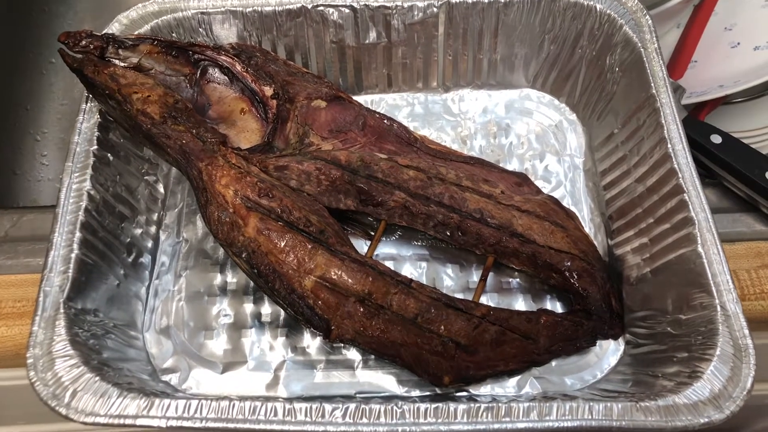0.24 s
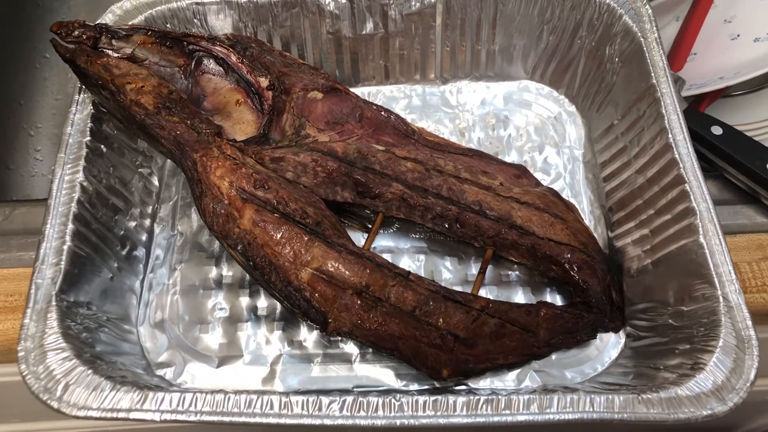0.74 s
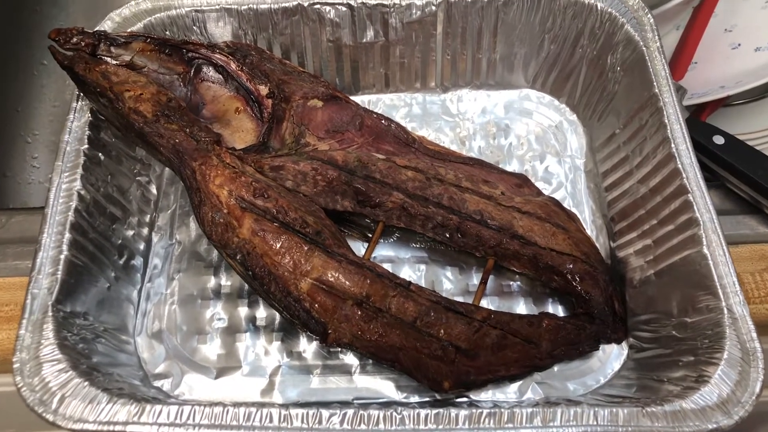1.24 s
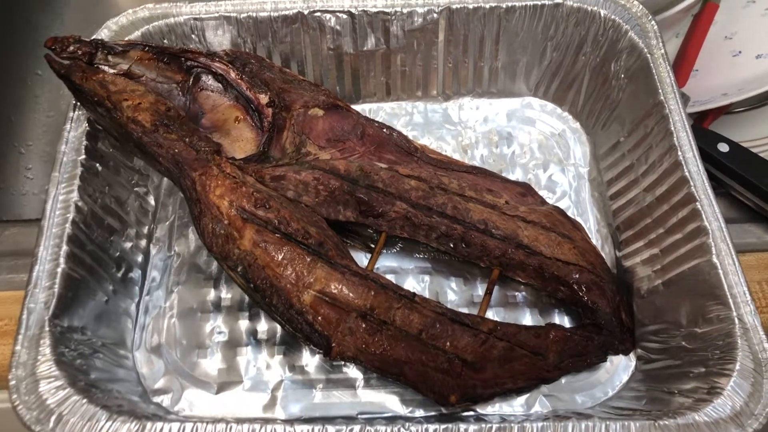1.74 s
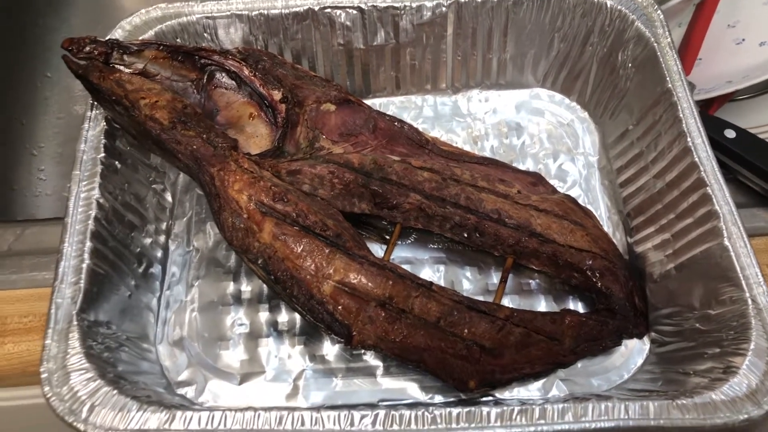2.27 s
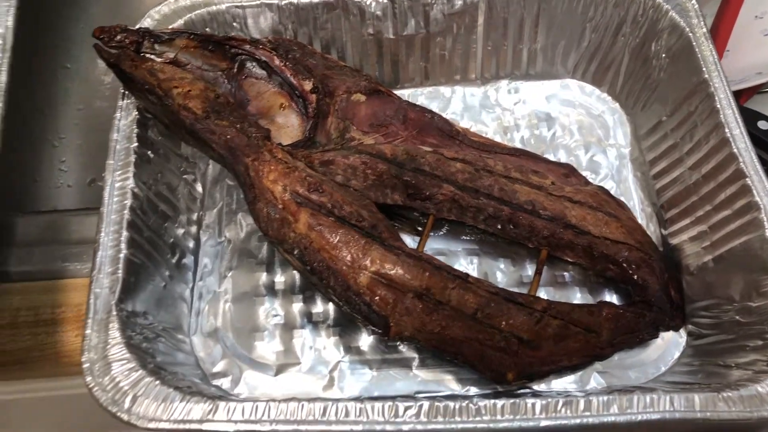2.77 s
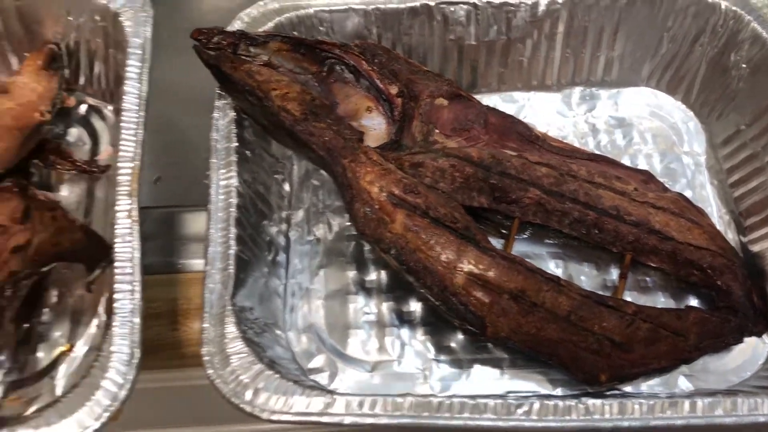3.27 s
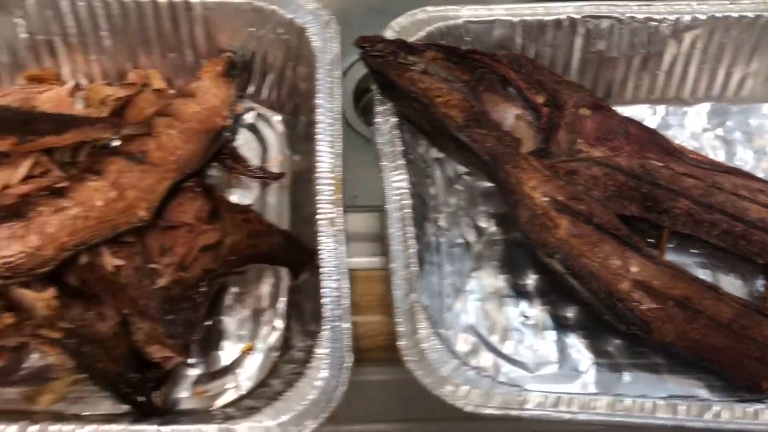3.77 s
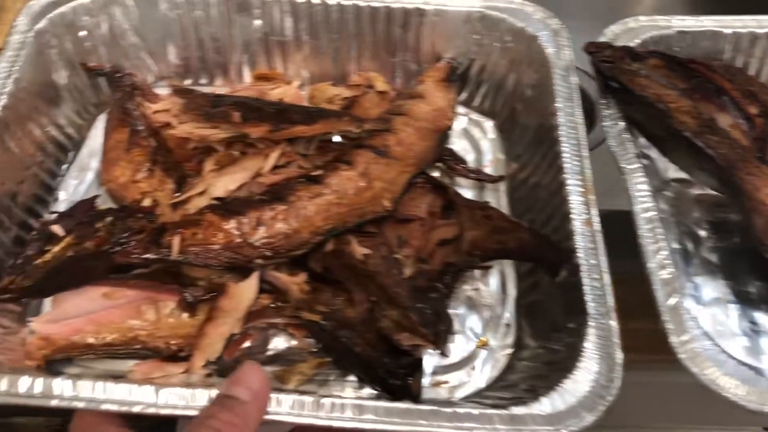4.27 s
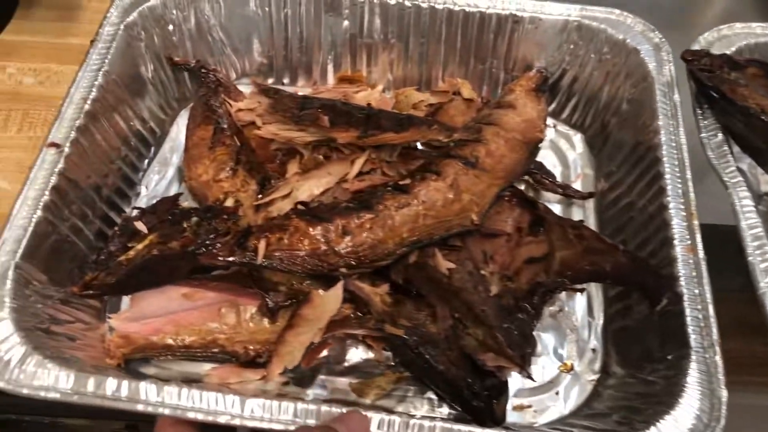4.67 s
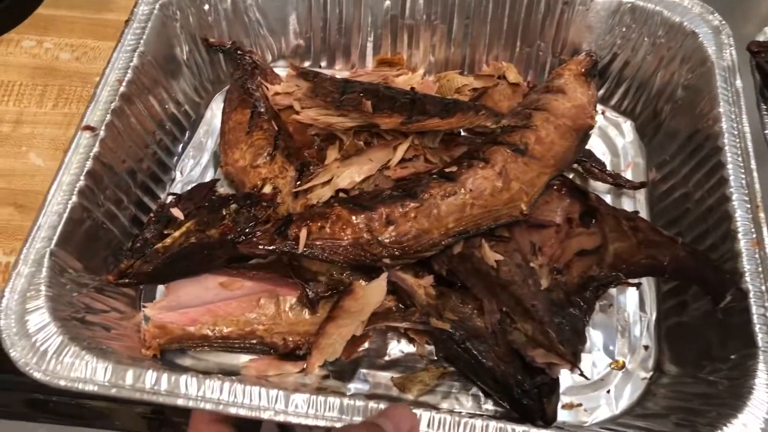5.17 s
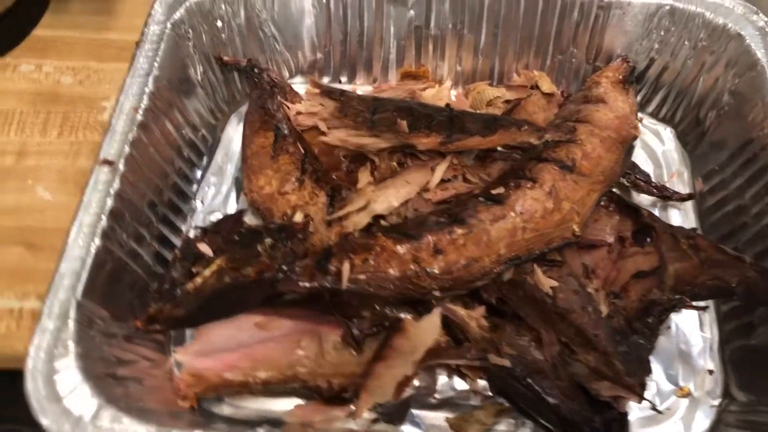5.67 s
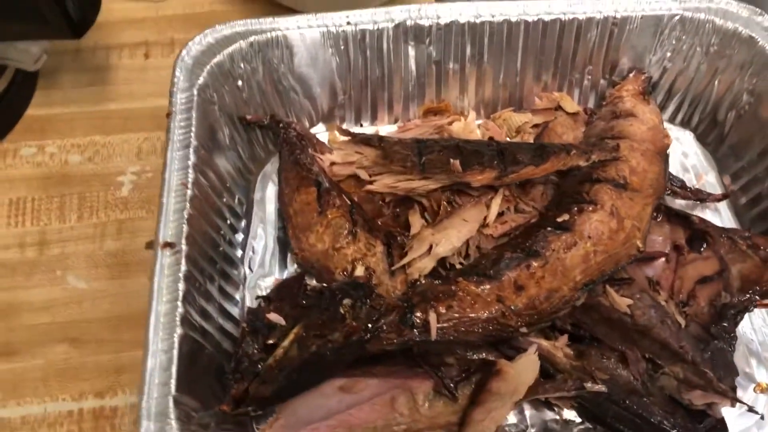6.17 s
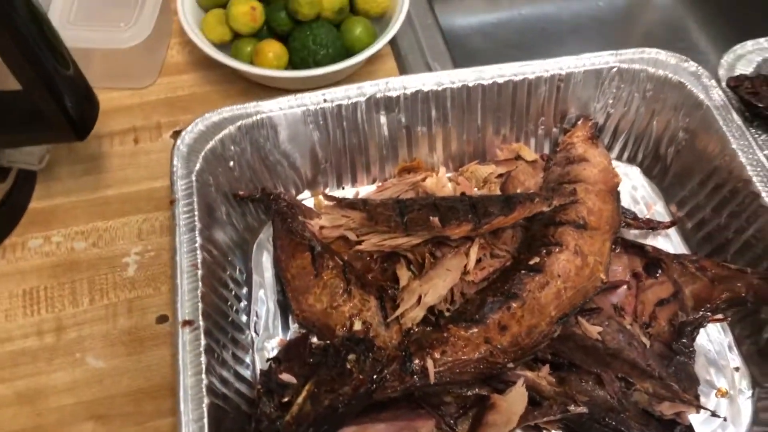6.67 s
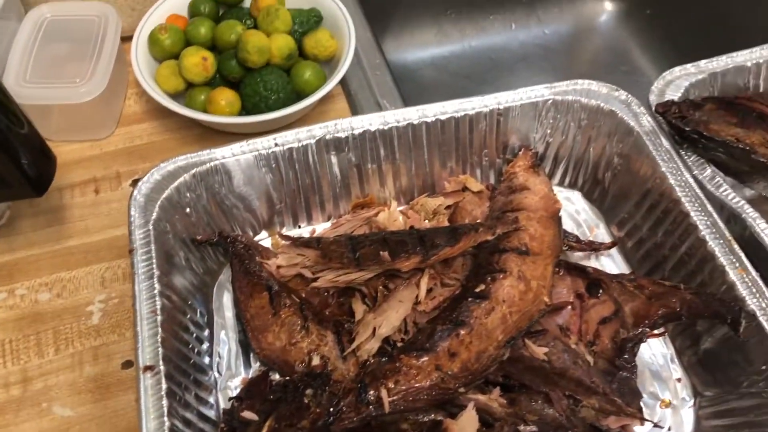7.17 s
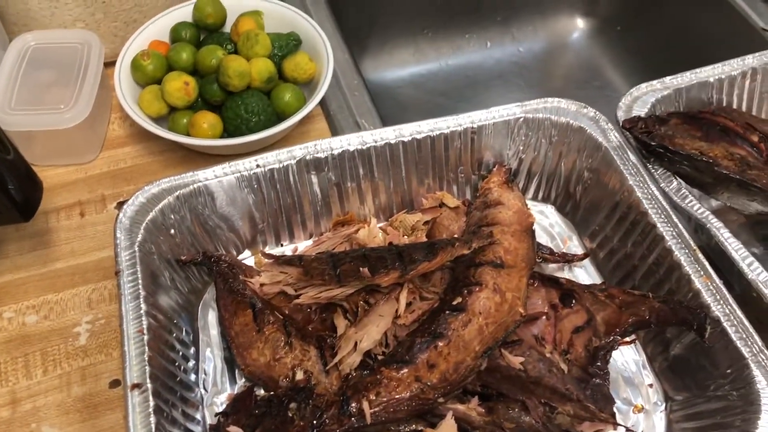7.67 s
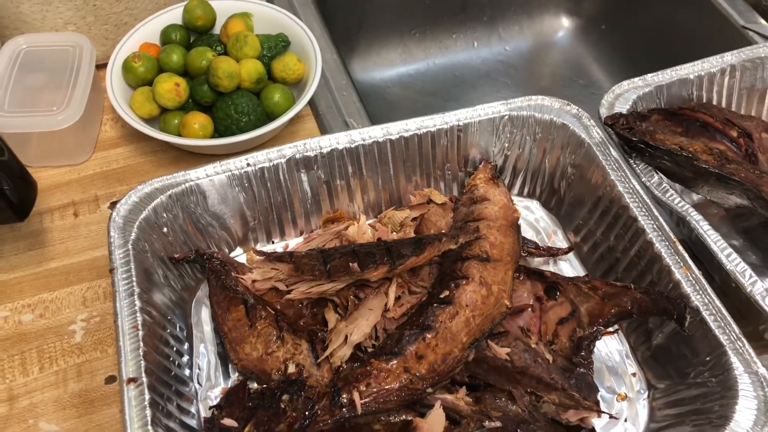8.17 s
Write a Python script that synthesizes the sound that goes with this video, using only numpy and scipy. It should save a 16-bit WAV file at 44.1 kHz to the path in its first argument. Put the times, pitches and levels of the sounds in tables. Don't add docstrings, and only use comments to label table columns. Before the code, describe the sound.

A thin foil pan holding cooked meat gets a sharp buckling blow, then rustles, slides and pops on a counter while a clock ticks.

```python
import sys
import numpy as np
from scipy import signal
from scipy.fft import rfft, irfft, next_fast_len
from scipy.io import wavfile
from scipy.ndimage import uniform_filter1d, map_coordinates

SR = 44100
rng = np.random.default_rng(int(sys.argv[2]) if len(sys.argv) > 2 else 0)


def undo_db(level):
    steps = np.asarray(level, float) / 20
    return 10 ** steps


def wrap_up_sound(samples):
    columns = np.atleast_2d(samples).T
    tamed = np.clip(columns, -1, 1)
    steps = np.round(tamed * 32767).astype(np.int16)
    wavfile.write(sys.argv[1], SR, steps)


N = 371763


def unit(x):
    return x / np.sqrt(np.mean(x ** 2) + 1e-20)


def along(points, hz):
    f, v = np.transpose(points)
    return np.interp(np.log(hz + 1), np.log(f + 1), v)


def wobble(rate_hz):
    knots = rng.standard_normal(int(N * rate_hz / SR) + 4)
    return map_coordinates(knots, [np.arange(N) * rate_hz / SR])


def filtered(x, response):
    m = next_fast_len(N + 8192)
    return irfft(rfft(x, m) * response(np.fft.rfftfreq(m, 1 / SR)), m)[:N]


def above(x, edge_hz):
    return filtered(x, lambda f: -f * f / (edge_hz ** 2 - f * f + 1j * np.sqrt(2) * f * edge_hz))


def resonant(x, peaks):
    def response(f):
        total = 0
        for k, (centre, width, db) in enumerate(peaks):
            damping = 1j * f * width
            total = total + (-1) ** k * undo_db(db) * damping / (centre * centre - f * f + damping)
        return total
    return unit(filtered(x, response))


def crackle(per_s, spread_db, smooth):
    hits = rng.random(N) < per_s / SR
    clicks = hits * undo_db(spread_db * rng.standard_normal(N)) * rng.choice([-1, 1], N)
    return unit(unit(clicks) + smooth * rng.standard_normal(N))


def patchy(x, depth_db, size=(5, 10)):
    z = signal.stft(x, nperseg=512)[2]
    field = uniform_filter1d(rng.standard_normal(z.shape), size=size[0], axis=0)
    field = uniform_filter1d(field, size=size[1], axis=1)
    return signal.istft(z * undo_db(depth_db * unit(field)), nperseg=512)[1][:N]


def add(track, s, sound):
    part = track[round(s * SR):][:len(sound)]
    part += sound[:len(part)]


# f/Hz, t60/s
KITCHEN = [(200, 0.15), (1000, 0.25), (4000, 0.16), (12000, 0.25)]


def echo(sound, wet_db, feed=None):
    hz, t, z = signal.stft(rng.standard_normal(SR // 3), SR, nperseg=256)
    decay = undo_db(-60 * t / along(KITCHEN, hz)[:, None])
    tail = signal.istft(z * decay, SR, nperseg=256)[1]
    tail *= 1 - np.exp(-np.arange(len(tail)) / (0.003 * SR))
    tail *= undo_db(wet_db) / np.linalg.norm(tail)
    wet = signal.fftconvolve(sound if feed is None else feed, tail)
    add(wet, 0, sound)
    return wet


def ring(hz, db, t60, phase, rise):
    t = np.arange(SR // 8)[:, None] / SR
    envelope = undo_db(db - 60 * t / t60) * (1 - np.exp(-t / rise))
    return (envelope * np.sin(2 * np.pi * hz * t + phase)).sum(axis=1)


# f/Hz, level/dB per Hz
AIR = [(24, -34), (40, -7), (101, -3), (140, -6), (204, -1), (382, -12), (444, -15), (630, -18),
       (715, -19.5), (1020, -17), (1520, -27), (1900, -27.5), (2210, -30.5), (9220, -39.5), (16000, -46)]
# f/Hz, level/dB
HUM = [(59.2, -90), (118.4, -65), (199.2, -67)]
# t/s, nearness to fan/dB
NEAR_FAN = [
    (0, 1.5),
    (2.5, -3.5),
    (3.75, 8),
    (4.2, -8),
    (7.3, -15),
    (8.43, -7),
]
FAN_DB, HUM_DB, HUM_YIELDS = -77, -4.2, .4


def kitchen():
    t = np.arange(N) / SR
    near_db = np.interp(t, *np.transpose(NEAR_FAN))
    noise = patchy(rng.standard_normal(N), depth_db=1.4)
    air = undo_db(-58.5) * unit(filtered(noise, lambda hz: undo_db(along(AIR, hz))))
    hum = np.zeros(N)
    for hz, db in HUM:
        hum += undo_db(db + 4 * wobble(10)) * np.sin(2 * np.pi * hz * t + 1.5 * wobble(9))
    fan = resonant(rng.standard_normal(N), [(1100, 110, 0)])
    return air + undo_db(HUM_DB - HUM_YIELDS * near_db) * hum + undo_db(FAN_DB + near_db) * fan


CLOCK_START_S, CLOCK_PERIOD_S = .497, .9963
# f/Hz, width/Hz, level/dB
CLOCK = [(1236, 310, 6), (2490, 530, -3), (3620, 390, -3), (5540, 570, -8.5), (7000, 1200, -16),
         (10540, 580, -14), (13100, 4400, -26.5)]


def clock():
    since = (np.arange(N) / SR - CLOCK_START_S + .5) % CLOCK_PERIOD_S - .5
    slack = undo_db(540 * (since - .004))
    rest = undo_db(-60 * np.maximum(since - .022, 0) / .21)
    rattle = crackle(per_s=1200, spread_db=4, smooth=1.1)
    return undo_db(-55.5) * np.where(since < .004, slack, rest) * resonant(rattle, CLOCK)


# t/s, length/s, level/dB
SCUFFS = [
    (4.595, 0.053, -61),
    (5.584, 0.055, -69.5),
    (6.53, 0.13, -60.5),
    (6.814, 0.09, -71),
    (7.082, 0.068, -64.5),
    (7.303, 0.11, -71.5),
    (7.531, 0.082, -63),
]
# f/Hz, width/Hz, level/dB
SOLE = [(2530, 410, 4), (4240, 320, -1.5), (5370, 840, -7), (9000, 1180, -24)]


def slippers():
    t = np.arange(N) / SR
    shape = sum(undo_db(db) * np.exp(-np.abs((t - s) / (length / 2)) ** 2.4) for s, length, db in SCUFFS)
    return shape * resonant(crackle(per_s=2600, spread_db=2.5, smooth=1.0), SOLE)


# t/s, peak/dB, f/Hz, t60/s
TINKS = [
    (0.9981, -48.5, 3360, 0.015),
    (3.1537, -53.5, 3320, 0.021),
]


def drops():
    out = np.zeros(N)
    for s, db, hz, t60 in TINKS:
        tink = ring(hz * np.array([1, 1.12]), db - np.array([2, 6]), t60, 0, rise=0.00074)
        add(out, s, echo(tink, wet_db=-8))
    return out


# from/s, to/s, f/Hz, width/Hz, level/dB
SQUEAK = (5.79, 5.98, 4180, 110, -74.5)


def squeak():
    start, end, hz, width, db = SQUEAK
    shape = np.interp(np.arange(N) / SR, [start, start + 0.036, end - .03, end], [0, 1, 1, 0])
    return undo_db(db) * shape * resonant(rng.standard_normal(N), [(hz, width, 0)])


# t/s, peak/dB, f/Hz, t60/s
KNOCKS = [(1.49, -42, 143, 0.041), (1.537, -38, 250, 0.02), (2.422, -33.5, 337, 0.077),
          (2.484, -35, 222, 0.064), (2.504, -26, 212, 0.094), (2.774, -34, 200, 0.059),
          (2.842, -23.5, 470, 0.018), (2.987, -31, 314, 0.035), (3.793, -38, 440, 0.031),
          (3.878, -29, 173, 0.047), (3.912, -27, 483, 0.038), (3.987, -42, 160, 0.085),
          (4.128, -40, 164, 0.05), (6.205, -49, 220, 0.085)]


def base_knocks():
    out = np.zeros(N)
    for s, db, hz, t60 in KNOCKS:
        bump = ring(hz * np.array([1, 1.45]), db - np.array([-1.5, 5]), t60, 0, rise=0.0012)
        add(out, s - .002, echo(bump, wet_db=-0.5))
    return out


# t/s, peak/dB, f/Hz, t60/s
TOCKS = [(0.853, -34, 820, 0.014), (1.486, -44, 560, 0.025), (1.535, -42, 480, 0.022),
         (2.419, -22, 950, 0.032), (2.503, -21.5, 1235, 0.059), (2.739, -20.5, 1400, 0.03),
         (2.841, -32.5, 980, 0.05), (2.986, -22.5, 1087, 0.036), (3.911, -22, 1040, 0.016),
         (5.058, -37.5, 796, 0.025), (5.561, -46, 1450, 0.042), (7.584, -50.5, 657, 0.035)]


def panel_tocks():
    out = np.zeros(N)
    for s, db, hz, t60 in TOCKS:
        note = ring(hz * np.array([1, 1.13]), db - np.array([3, 8]), t60, 0, rise=0.00019)
        add(out, s, echo(note, wet_db=-9.0))
    return out


BLOW_S = 2.175
STRAIN_S, STRAIN_DB, STRAIN_FIZZ_DB, STRAIN_SWELL_DB = .03, -55, -10, 11
# t/s, pressure/dB
SLIDE = [
    (2.175, -72),
    (2.22, -58.5),
    (2.333, -48),
    (2.41, -44),
    (2.6, -48),
    (2.81, -56),
    (3.06, -56.5),
    (3.105, -72),
    (3.3, -80),
]
SLIDE_FIZZ_DB, FIZZ_GROWS, FIRM_DB = -8, 1.3, -50.5
# peak t/s, rise/s, fall/s, body/dB, fizz/dB re body
RUBS = [
    (1.46, .05, 0.036, -82, 2.5),
    (3.49, .15, .35, -63.5, -6.5),
    (3.68, 0.063, 0.28, -59.5, -10),
    (4.32, 0.24, 0.16, -56.5, -7.5),
    (4.465, .03, 0.094, -61.5, -19.5),
    (4.67, .2, 0.33, -70, -9),
    (5.17, 0.33, 0.38, -67, -6),
    (5.47, .04, 0.45, -71.5, -10),
    (6.04, 0.25, 0.2, -67, -4),
]
RUB_FADE_DB = 20


def strokes():
    t = np.arange(N) / SR
    before = (BLOW_S - t) / STRAIN_S
    swell_db = STRAIN_SWELL_DB * (1 - np.clip(before, 0, 1))
    strain = (before > 0) * (before < 1) * undo_db(STRAIN_DB + swell_db)
    press_db = np.interp(t, *np.transpose(SLIDE), left=-140, right=-140)
    body = strain + undo_db(press_db)
    fizz = undo_db(STRAIN_FIZZ_DB) * strain + undo_db(FIRM_DB + SLIDE_FIZZ_DB + FIZZ_GROWS * (press_db - FIRM_DB))
    for s, rise, fall, db, fizz_db in RUBS:
        rub = undo_db(db - RUB_FADE_DB * ((t - s) / np.where(t < s, rise, fall)) ** 2)
        body = body + rub
        fizz = fizz + undo_db(fizz_db) * rub
    return body, fizz


# f/Hz, level/dB per Hz
BODY = [(180, -33.5), (300, -4.5), (396, -13), (495, 1.5), (611, -18), (679, -14.5), (1480, -7),
        (7000, -16.5), (9100, -42), (15400, -120)]
FIZZ = [(2650, -29), (4500, -2), (6320, -9), (7370, -8.5), (8830, -3.5), (15200, -11.5), (16000, -13.5)]
# f/Hz, width/Hz, level/dB
CREASES = [(2686, 500, 1.5), (5200, 1500, -2), (7800, 400, -3.5), (8100, 500, 4.5), (11700, 400, 2.5)]


def rustle():
    clumps = undo_db(1.1 * wobble(40) + .9 * wobble(13))
    grains = patchy(crackle(per_s=3000, spread_db=4.5, smooth=1.3) * clumps, depth_db=1.1)
    grains = patchy(grains, depth_db=1.8, size=(2, 24))

    def through(spectrum):
        def response(hz):
            ribs_db = sum(db / (1 + ((hz - c) / w) ** 2) for c, w, db in CREASES)
            return undo_db(along(spectrum, hz) + ribs_db)
        return unit(filtered(grains, response))

    body, fizz = strokes()
    return body * through(BODY) + fizz * through(FIZZ)


# f/Hz, level/dB, t60/s
RIM = [(522, -5, 0.11), (1459, -6, 0.11), (2482, -12, 0.15), (2729, -27, 5.0), (3289, -14, 0.17),
       (3408, 0, 0.069), (3914, -15.5, 0.14), (4387, -33, 2.2), (4861, -22, 0.13), (5464, -20, 0.19),
       (5905, -29, 0.36), (6363, -18, 0.13), (6492, -24, 0.21), (6621, -27, 0.14)]
# f/Hz, level/dB per Hz
SHUDDER = [(180, -40), (300, -10), (565, -0.5), (1510, -3.5), (3080, -7.5), (3400, -2), (4520, -14.5),
           (6410, -18.5), (16000, -34)]


def blow_aftermath():
    out = np.zeros(N)
    hz, db, t60 = np.transpose(RIM)
    phase = 2 * np.pi * rng.random(len(hz))
    rim = ring(hz, db - 17, .8 * np.minimum(t60, .12), phase, rise=3 / hz)
    add(out, BLOW_S, echo(rim, wet_db=-5))
    t = np.arange(8192) / SR
    shake = undo_db(-16.0 - 60 * t / 0.066) * rng.standard_normal(len(t))
    colour = undo_db(along(SHUDDER, np.fft.rfftfreq(len(t), 1 / SR)))
    add(out, BLOW_S, echo(irfft(rfft(shake) * colour), wet_db=-4.5))
    return out


def averaged(x):
    power = np.abs(uniform_filter1d(np.abs(rfft(x)) ** 2, size=120))
    return np.roll(irfft(np.sqrt(power)), 150)[:600]


# f/Hz, level/dB
FOIL = [(150, -25.5), (330, -15), (15500, 8.5), (16500, -32)]
# f/Hz, t60/s
SHEET = [(700, 0.11), (1900, 0.026), (4000, 0.056), (7000, 0.059), (12500, 0.021)]
# t/s, crease peak/dB, wall/dB re crease, sharpness/dB per oct, droop/dB per oct^2, spark/dB
BLOW = (2.1744, -6.3, -5, 3.5, 4.8, 12)
# t/s, crease peak/dB, wall/dB re crease, sharpness/dB per oct above the crease
BUCKLES = [(0.8535, -51, -9, -20), (1.4719, -60, -3, 6), (1.5322, -55, 4, 3), (2.4164, -23, -1, 4.5),
           (2.4304, -29.5, -8, 5.5), (2.5046, -26.5, 6, -2), (2.5136, -39, 0, 3.5),
           (2.7365, -17.5, -13, 0.5), (2.8418, -28.5, 0, 1.5), (2.9855, -29.5, 1, -20),
           (3.672, -51, -2, 16), (3.7507, -49, 2, 9.5), (3.7941, -39, -7, 5), (3.8736, -42, 5, 11),
           (3.91, -14.5, -8, 4.5), (4.132, -57, 12.5, 6), (5.0581, -40, -0.5, 4.5),
           (5.2002, -48, 5.5, 11.5), (5.563, -46.5, -17, -6), (5.9852, -49, -9.5, 12),
           (7.3664, -54.5, 1, 6)]
# t/s, crease peak/dB, sharpness/dB per oct
TICKS = [(1.453, -72, 4), (2.9494, -51, 1), (3.6336, -56, 6.5), (3.7342, -54, 9), (3.7864, -51, 6),
         (3.805, -58, -3), (3.8397, -60, 4), (3.9854, -55, -4), (4.1889, -51, -5), (4.6915, -58, 2.5),
         (4.7194, -67, -2), (4.783, -62.5, 10), (4.874, -62, 6), (5.177, -54, 2), (5.2827, -55, 1),
         (5.3277, -57.5, 5)]
BUCKLE_DROOP, TICK_DROOP = 5.1, 2.5
TICK_WALL_DB, BUCKLE_SPARK_DB = -5, 2.5


def pops():
    out, t = np.zeros(N), np.arange(8192) / SR
    hz = np.fft.rfftfreq(len(t), 1 / SR)
    centre, t60 = np.transpose(SHEET)
    share = np.array([along(list(zip(centre, one)), hz) for one in np.eye(len(SHEET))])
    share = np.sin(np.pi / 2 * share) ** 2
    rise = 1 - np.exp(-t * centre[:, None] ** .5 / .025)
    fall = undo_db(-60 * t / .009) + undo_db(-7 - 60 * t / t60[:, None])
    octaves = np.log2(centre[1:] / centre[1])
    top = octaves == octaves[-1]
    rows = [BLOW]
    rows += [(*row, BUCKLE_DROOP, BUCKLE_SPARK_DB) for row in BUCKLES]
    rows += [(s, db, TICK_WALL_DB, sharp, TICK_DROOP, 0) for s, db, sharp in TICKS]
    for s, db, wall_db, sharp, droop, spark_db in rows:
        noise = rfft(rng.standard_normal(len(t)))
        bands = irfft(noise * share * undo_db(along(FOIL, hz))) * rise * fall
        bands /= np.abs(bands).max(axis=1, keepdims=True)
        crease_db = sharp * octaves - droop * octaves ** 2 + spark_db * top
        pop = undo_db(db + np.array([wall_db, *crease_db])) @ bands
        add(out, s, echo(pop, wet_db=-8, feed=averaged(pop)))
    return out


THIN_HZ, SMALL_HZ = 260, 95


def scene():
    sheet = above(pops() + blow_aftermath(), THIN_HZ)
    small = above(base_knocks() + panel_tocks() + drops(), SMALL_HZ)
    pan = sheet + small + rustle() + squeak()
    return (kitchen() + clock() + slippers() + pan)[None]


def low_pass(x):
    return signal.sosfilt(signal.butter(12, 16810, fs=SR, output="sos"), x)


TOP_HZ = 15900


def record(dry):
    x = filtered(dry[0], lambda hz: 1j * hz / (25 + 1j * hz) * np.where(hz < TOP_HZ, 1, .25))
    x = x / (1 + np.abs(x / .9) ** 6) ** (1 / 6)
    return low_pass(x[None])


dry = scene()
out = record(dry)
wrap_up_sound(out)
```